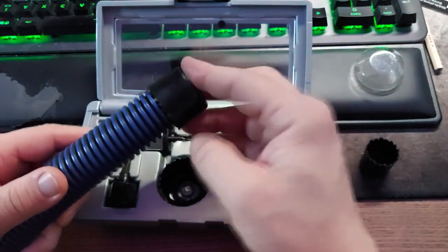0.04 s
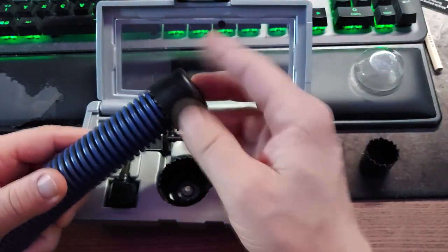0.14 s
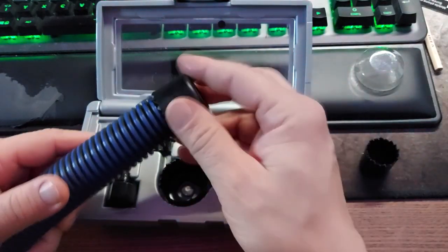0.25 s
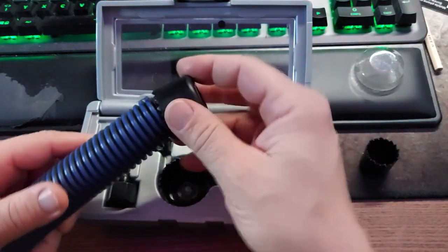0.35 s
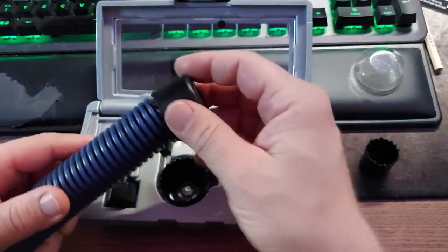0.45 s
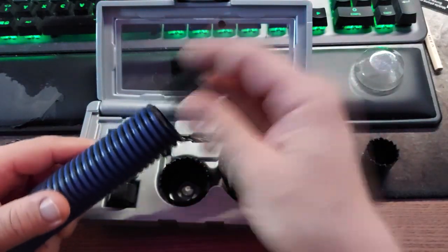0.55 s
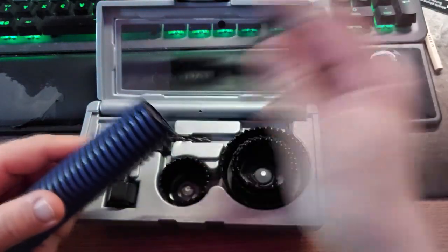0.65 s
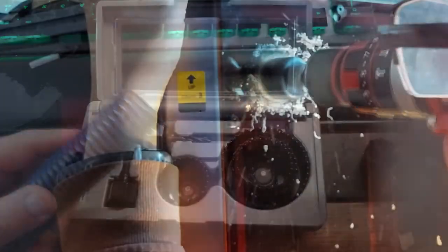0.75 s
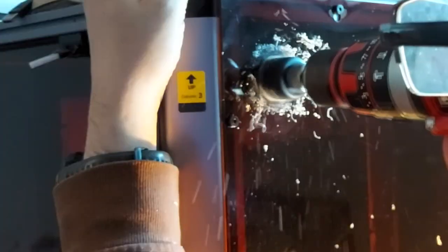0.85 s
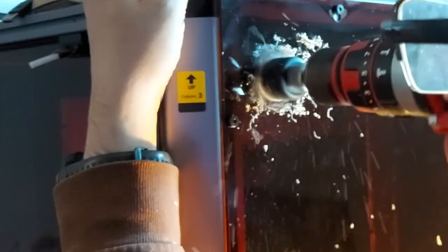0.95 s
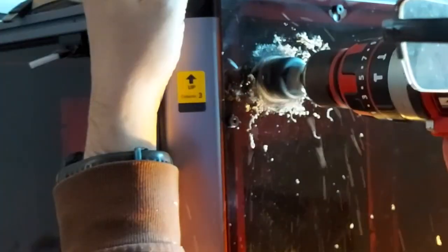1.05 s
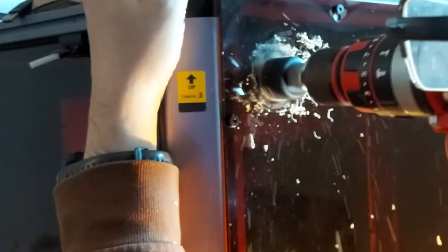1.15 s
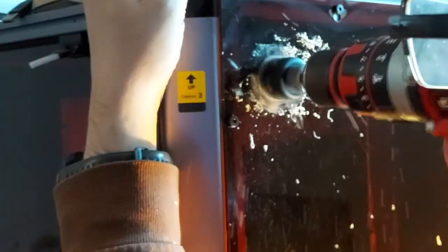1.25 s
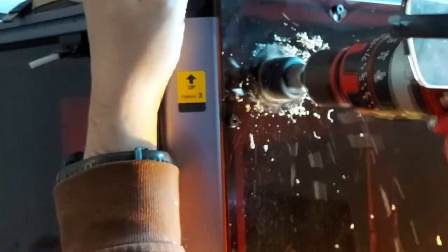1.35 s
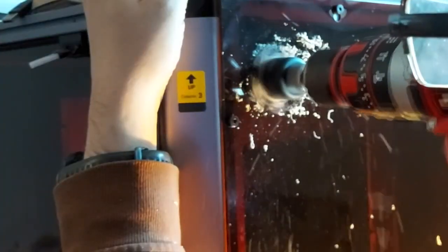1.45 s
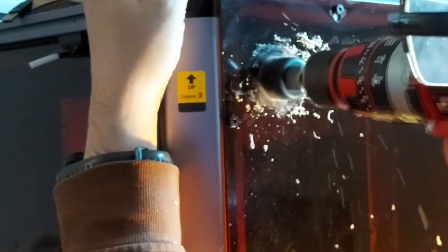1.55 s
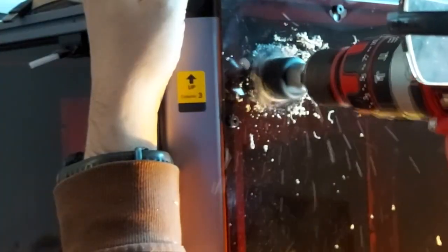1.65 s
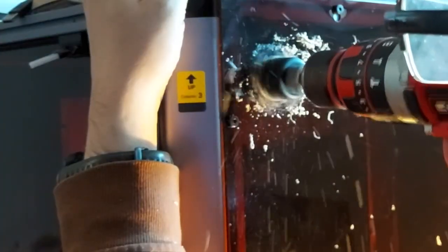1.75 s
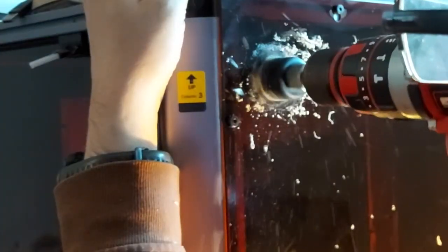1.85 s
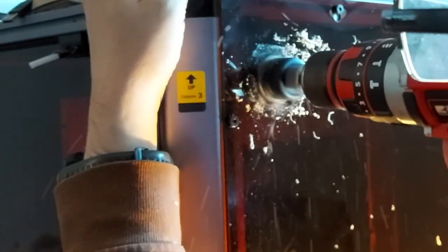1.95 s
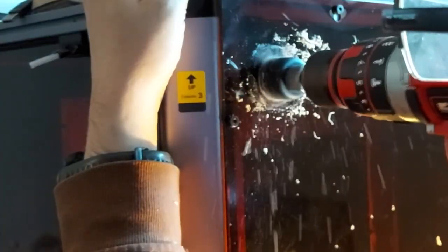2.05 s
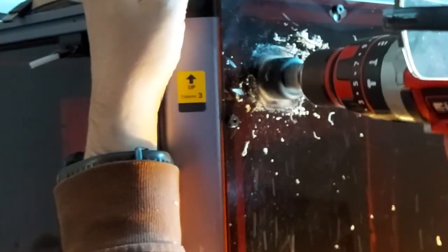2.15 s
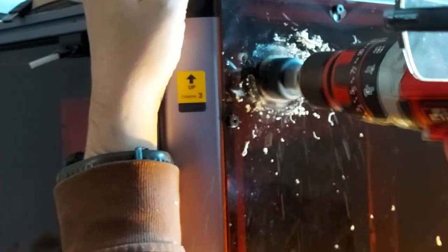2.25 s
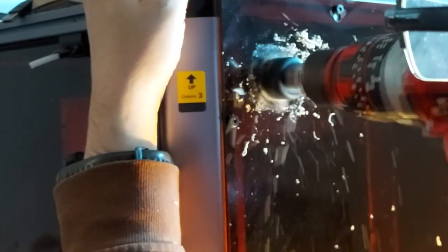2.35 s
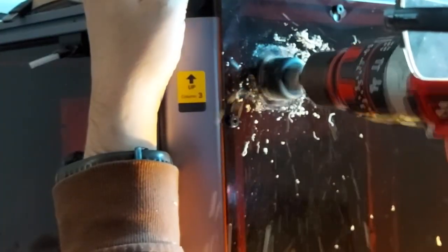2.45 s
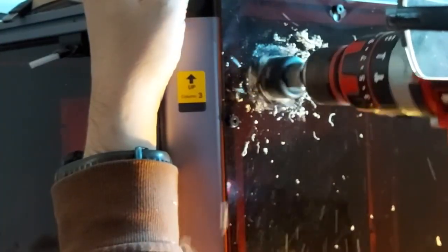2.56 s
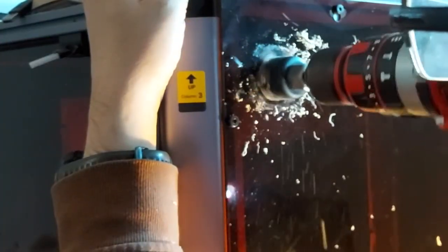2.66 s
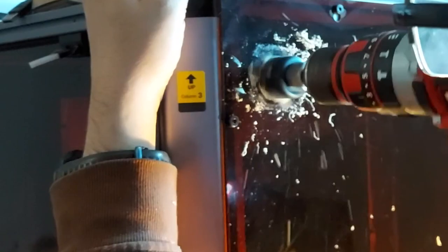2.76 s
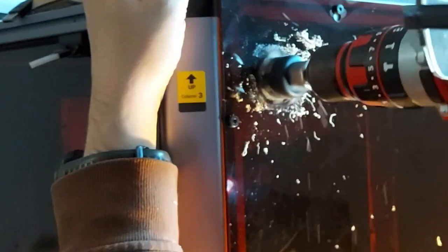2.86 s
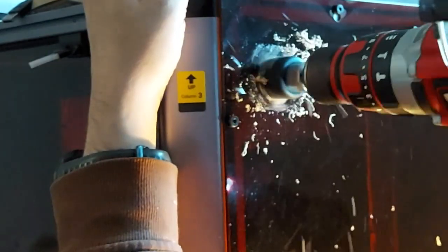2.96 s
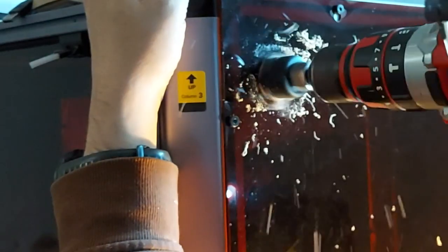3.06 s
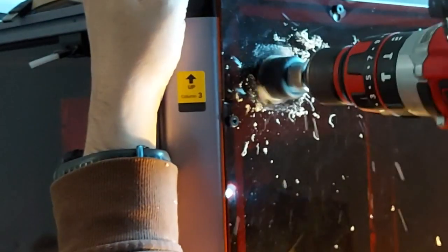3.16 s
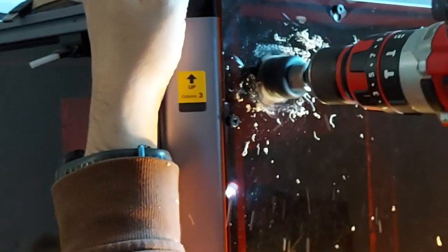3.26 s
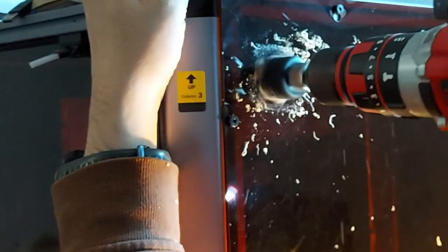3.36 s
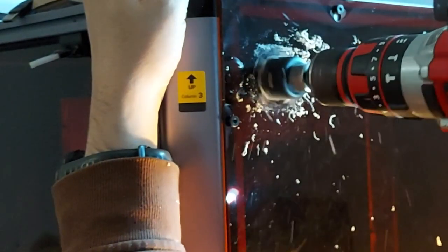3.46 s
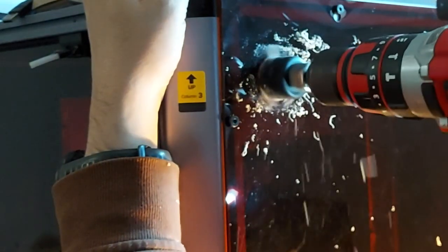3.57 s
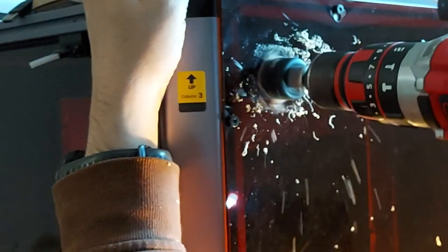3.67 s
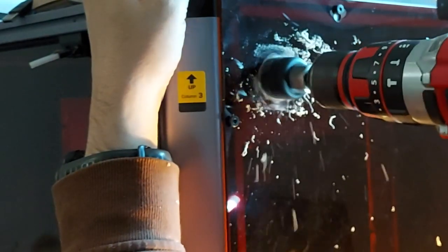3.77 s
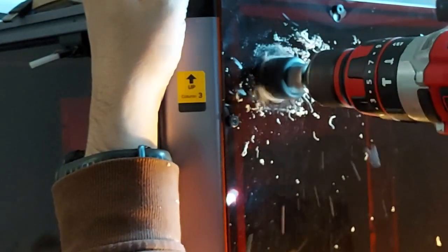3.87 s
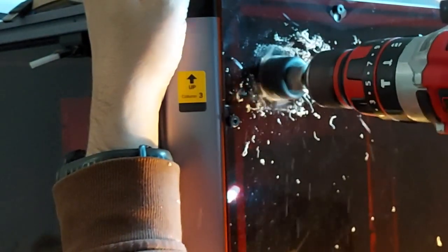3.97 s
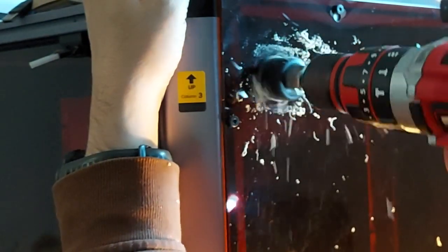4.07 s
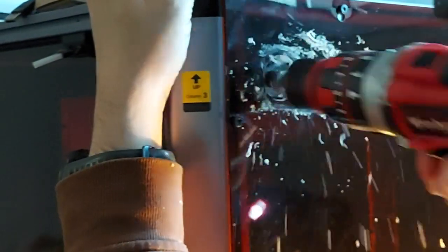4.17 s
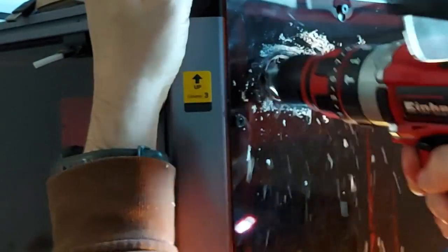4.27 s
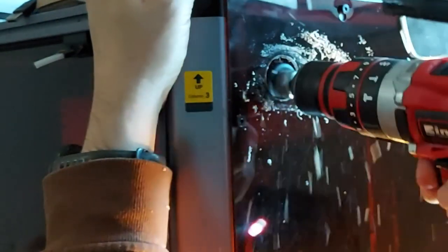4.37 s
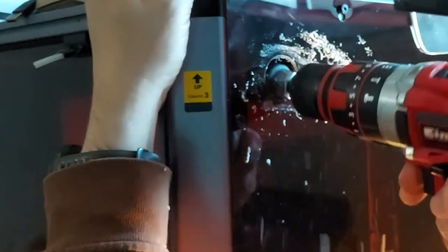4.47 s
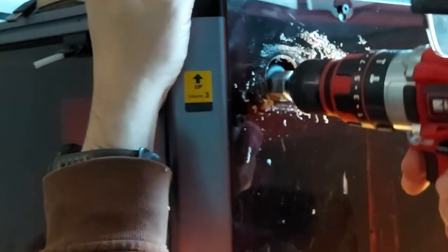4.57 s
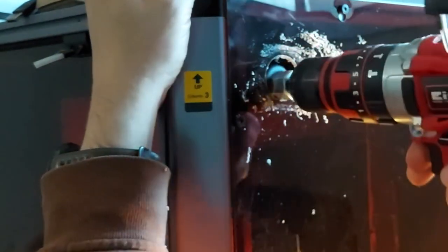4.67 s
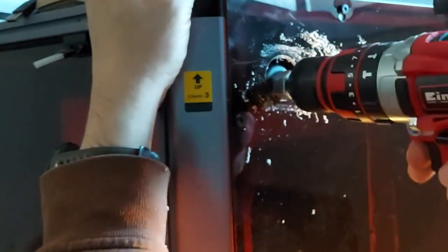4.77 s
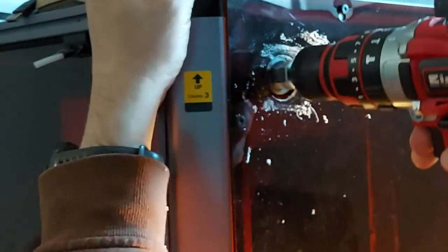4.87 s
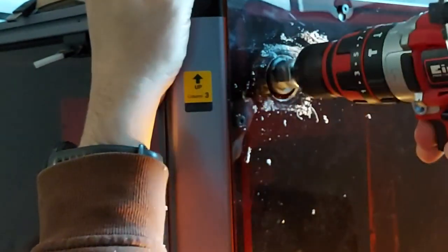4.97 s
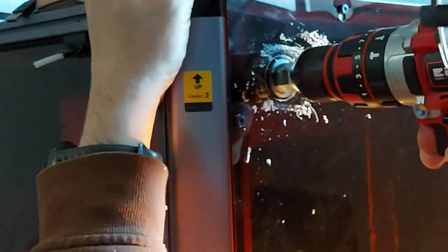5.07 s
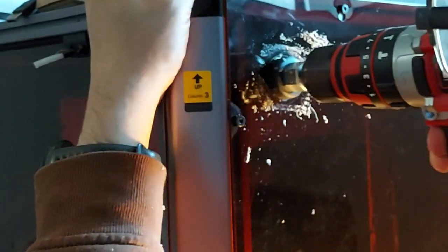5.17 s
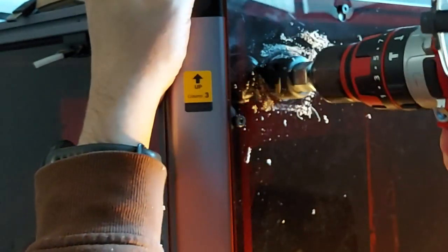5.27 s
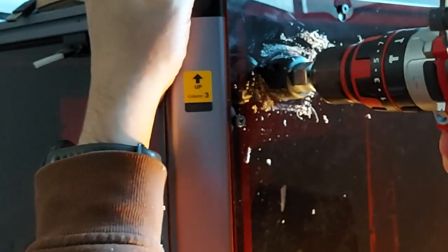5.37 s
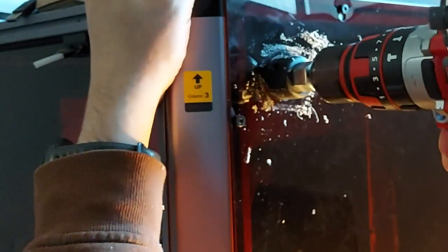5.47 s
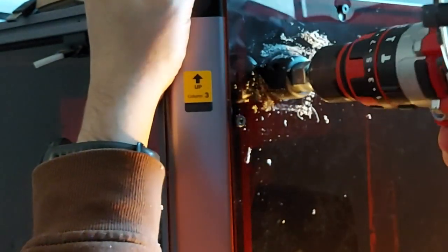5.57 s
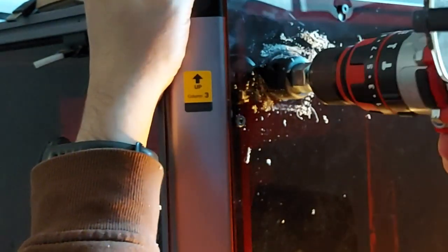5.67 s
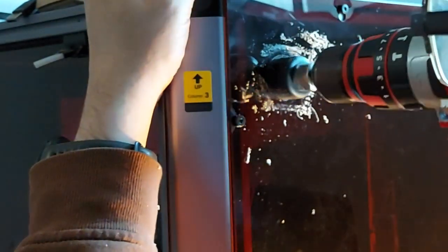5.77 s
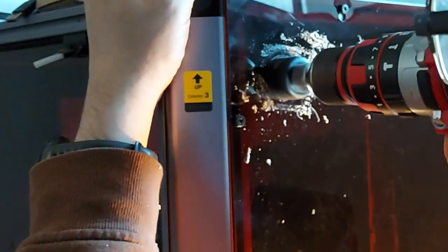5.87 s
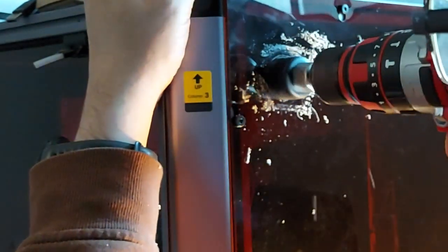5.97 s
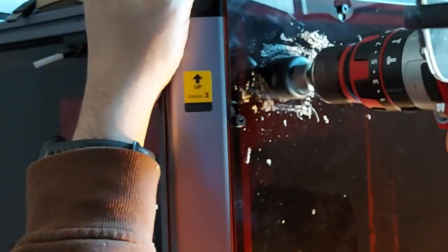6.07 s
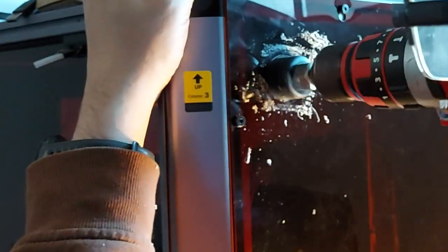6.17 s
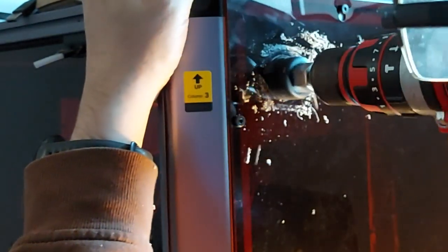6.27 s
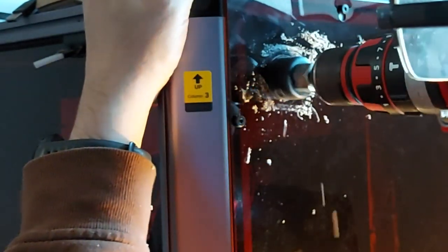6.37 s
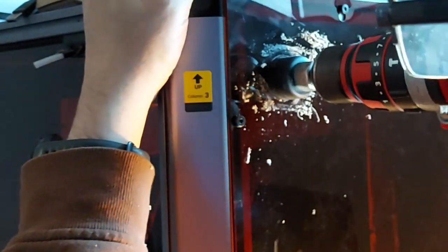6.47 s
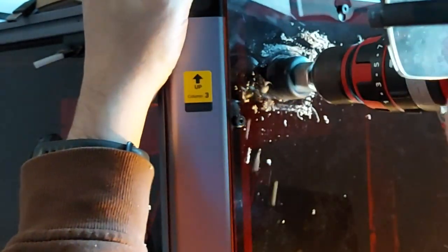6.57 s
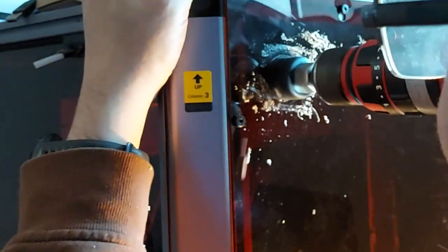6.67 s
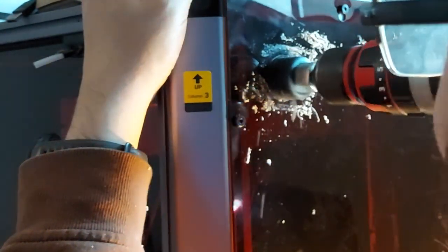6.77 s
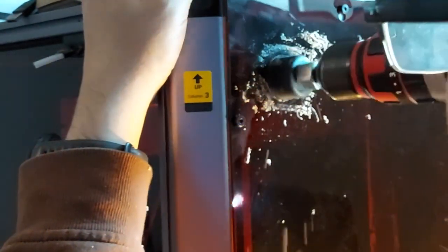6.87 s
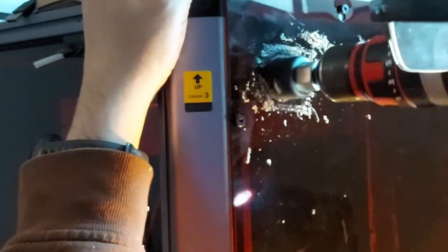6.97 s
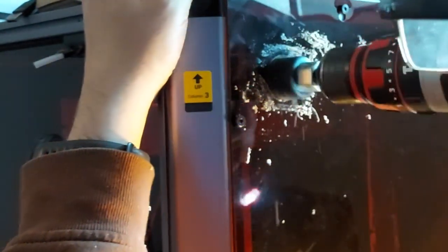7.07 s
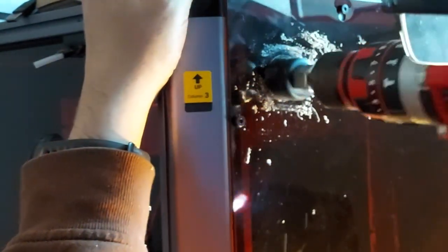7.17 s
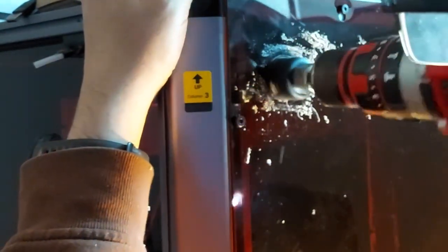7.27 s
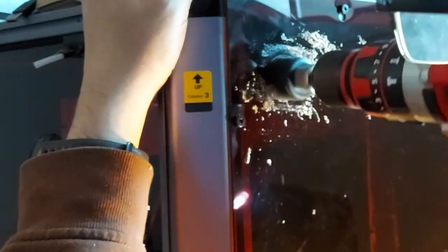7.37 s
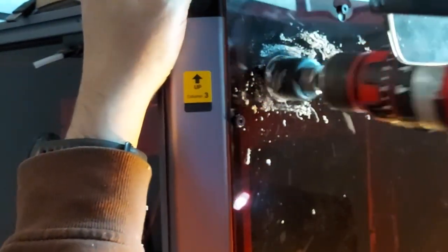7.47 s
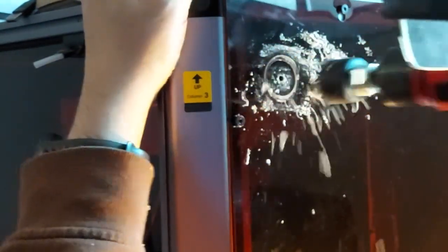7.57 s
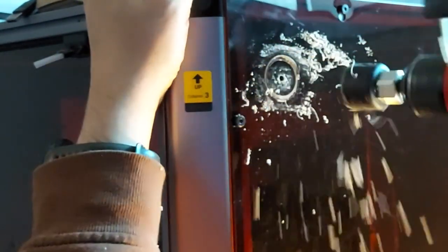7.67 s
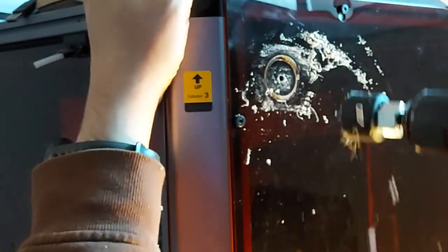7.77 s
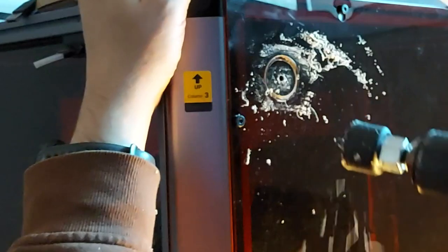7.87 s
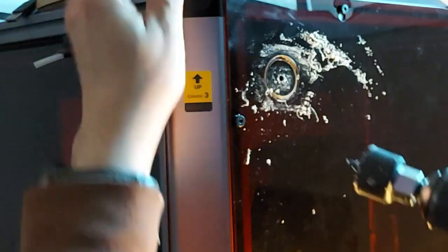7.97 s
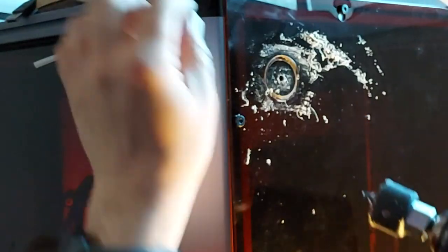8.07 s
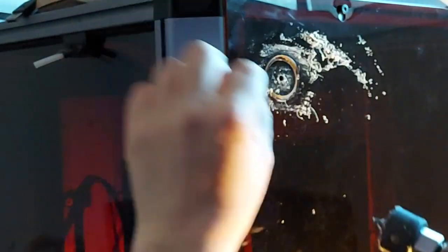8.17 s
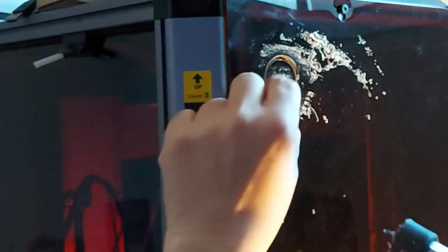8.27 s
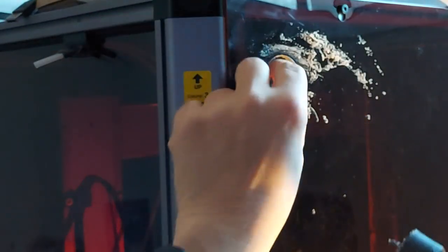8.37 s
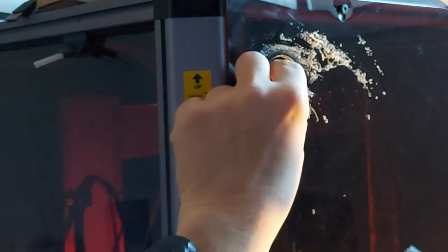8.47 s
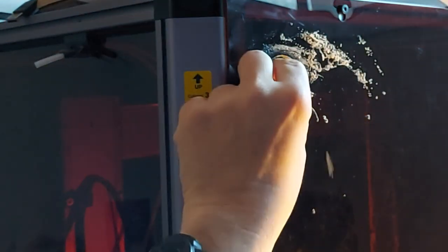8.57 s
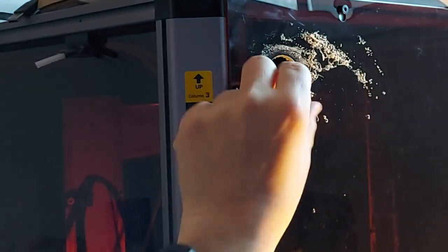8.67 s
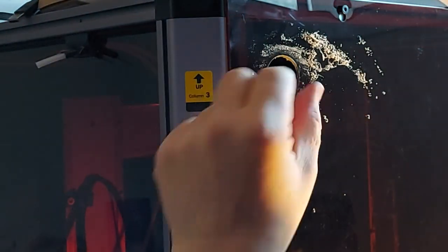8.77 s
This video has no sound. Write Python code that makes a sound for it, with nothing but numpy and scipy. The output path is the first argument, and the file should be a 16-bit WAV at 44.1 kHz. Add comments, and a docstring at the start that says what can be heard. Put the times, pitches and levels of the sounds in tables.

```python
"""A faint tap on a quiet desk, a thin whistle and two tiny squeaks; then a cut to a workshop, where a
cordless drill drives a hole saw into a plastic panel, jams, is lifted, set down again and finishes
slowly. Fingers pick at the chips. Gears whine over the rasp of the teeth, blows ring the plastic, the
panel rattles and the bench booms. Two close microphone ports hear it in a small room."""
import sys
import numpy as np
from scipy import signal
from scipy.fft import rfft, irfft, next_fast_len
from scipy.io import wavfile
from scipy.ndimage import uniform_filter1d

SR = 44100
rng = np.random.default_rng(int(sys.argv[2]) if len(sys.argv) > 2 else 0)


def store_wav(level_fs):
    """Save 16-bit WAV to argv[1]."""
    pcm = np.round(np.clip(np.atleast_2d(level_fs), -1, 1) * 32767)
    wavfile.write(sys.argv[1], SR, pcm.T.astype(np.int16))


N = 388976
T = np.arange(N) / SR
FFT_SIZE = next_fast_len(N + 8192)
FREQS = np.maximum(np.arange(FFT_SIZE // 2 + 1) * SR / FFT_SIZE, 1)

# room tone of each place (frequency [Hz], relative level [dB])
DESK_SPECTRUM = [(18, -67), (30, -28), (161, -4), (319, -15), (384, -20.5), (988, -31), (1100, -23),
                 (1320, -31), (3400, -37.5), (3670, -44), (8980, -45.5), (11100, -53), (16000, -33)]
SHOP_SPECTRUM = [(18, -48), (30, -20), (81, 3), (106, -15.5), (355, -20.5), (449, -20.5), (988, -33.5),
                 (2750, -35.5), (7670, -42), (8980, -52.5), (16000, -36)]
# sharp cracks, mostly teeth on the panel (time [s], level [dB], colour [Hz])
CRACK_HITS = [(0.1235, -43, 1250), (2.289, -12, 3000), (2.2993, -11, 2600), (2.3405, -9.5, 2030),
              (2.352, -10.5, 2200), (2.549, -16, 2060), (2.885, -18, 2160), (3.19, -10, 1750),
              (3.752, -10, 2180), (4.068, -13.5, 1700), (4.157, -11, 2800), (4.173, -8, 2128),
              (4.183, -6, 1780), (4.19, -12, 1790), (4.2576, -4, 2900), (4.269, -4, 2300),
              (4.281, -15, 1700), (4.327, 0, 2400), (5.67, -37, 1500), (5.674, -23, 1200), (5.66, -26, 900),
              (5.7, -32, 2000), (5.682, -28, 1500), (5.7862, -18.5, 2900), (5.7915, -20, 2900),
              (5.8004, -16, 3000), (5.815, -21, 2600), (7.514, -8, 1500)]
# tool and fingers tap desk and panel (time [s], level [dB], colour [Hz], bass [dB])
TAP_HITS = [(0.128, -55, 480, 4), (3.205, -17, 870, -18), (3.555, -20.5, 760, -27), (3.76, -16, 870, -22),
            (4.173, -12, 694, -14), (4.19, -14.5, 750, -7), (4.27, -11, 600, -2.5), (4.286, -15, 480, -3),
            (4.682, -43, 565, -10.5), (4.689, -42.5, 494, 2), (4.873, -39.5, 2980, -21.5),
            (4.933, -36.5, 1660, -2), (4.948, -37, 557, -0.5), (5.098, -51, 620, -12.5),
            (5.232, -23, 2010, -9), (5.247, -31.5, 400, 2), (5.305, -33, 420, 0), (5.318, -32, 1500, -6),
            (5.333, -38, 1200, -2), (5.356, -37.5, 900, -9), (5.449, -40.5, 1000, -14),
            (5.523, -36, 1100, -13), (5.542, -42, 890, -7), (5.584, -29, 1870, -20),
            (5.595, -28, 1900, -22), (5.785, -25.5, 500, -8), (5.803, -28, 450, -2.5),
            (8.297, -49.5, 622, -6.5), (8.313, -47.5, 1900, 0.5), (8.322, -53, 398, 4),
            (8.465, -56.5, 1700, -11), (8.531, -50, 4800, -24), (8.618, -53, 1590, -6.5),
            (8.774, -42, 660, -8.5), (8.787, -47.5, 647, -8)]
# the panel's low ring (frequency [Hz], relative level [dB], t60 [s])
PANEL_MODES = [(70, -8.5, 0.21), (139.8, -1.5, 0.19), (263, 4, 0.098), (345, -2.5, 0.077)]
# the plastic's clack (frequency [Hz], bandwidth [Hz])
PLASTIC_MODES = [(480, 67), (650, 80), (870, 90), (1150, 200), (1650, 240), (2100, 240), (2950, 350),
                 (4250, 570), (5800, 700)]
# rising whistle (time [s], pitch [Hz], level [dB])
WHISTLE_GLIDE = [(0.37, 5800, -100), (0.44, 6900, -87), (0.52, 8150, -84), (0.6, 8300, -87),
                 (0.68, 8900, -96)]
# squeaks of the hose cap and saw cup (time [s], pitch [Hz], level [dB], t60 [s])
SQUEAK_RINGS = [(0.594, 3420, -71, 0.05), (0.655, 3400, -70, 0.06), (5.276, 4120, -28, 0.07)]
# one list per trigger pull (time [s], gear mesh rate [Hz], cut level [dB], whine [dB], panel shake [dB])
TRIGGER_PULLS = [
    [(0.74, 1699, -65, 0, 8), (0.76, 1702, -38.5, 2.5, -1), (0.83, 1697, -30, 1, -0.5),
     (1.1, 1701, -28.5, 2.5, 0), (2.17, 1684, -28.5, -0.5, -1.5), (2.3, 1665, -28.5, -3, 1.5),
     (2.37, 1400, -31.5, -2, 5.5), (2.44, 1320, -33, -10, 3), (2.63, 1201, -33.5, -12, -1.5),
     (2.72, 1547, -30.5, -2, -4.5), (2.78, 1636, -31.5, 5.5, -1.5), (2.86, 1430, -30.5, -12, -1),
     (2.92, 1589, -30.5, 1, -2), (3.06, 1704, -29.5, -0.5, 1), (4.01, 1698, -30.5, -0.5, 0),
     (4.14, 1701, -29, -0.5, 5.5), (4.165, 1673, -27, -9, 6), (4.2, 1703, -28.5, -3, 10),
     (4.26, 1748, -31.5, 1.5, 11.5), (4.4, 1776, -35, 2.5, 9.5), (4.51, 1570, -39.5, -4, 13.5),
     (4.68, 1303, -78.5, -21, 26.5)],
    [(5.8, 1564, -48, -13, 11.5), (5.9, 1572, -33, 0, 5.5), (6.08, 1236, -38, 0, 5),
     (6.34, 736.6, -44, 0.5, -0.5), (6.48, 1065, -39.5, 1, 4.5), (6.92, 1059, -39, 0.5, 2.5),
     (7.0, 1021, -38.5, -5, 5.5), (7.22, 1021, -39, -3, 5), (7.33, 1042, -38.5, 0, 16),
     (7.39, 1524, -33.5, 1, 4), (7.46, 1679, -31.5, 1.5, 7.5), (7.6, 1776, -32, -1, 9.5),
     (7.66, 1758, -34, 3.5, -10), (7.75, 1610, -33.5, -3, -7), (7.88, 1500, -61.5, -24.5, -2),
     (7.98, 1300, -83, -10, -0.5)],
]
# motor and gear tones (multiple of the mesh rate [ratio], relative level [dB])
GEAR_PARTIALS = [(.2, -11.5), (.8, -9.5), (1, -2.5), (1.2, -13), (2, -2), (2.13, -6), (3, -1), (4, -21),
                 (6, -14)]
# level rides on the lower tones (time [s], 1x [dB], 2x [dB], 2.13x [dB], 0.8x and 1.2x [dB])
GEAR_RIDES = [(0.74, -6, -8, -8, -5), (2.3, -5, -8, -3, -4), (2.95, -1, -4, -10, -4),
              (3.45, -1, -3, -9, -4), (4.1, -2, -2, -8, -2), (4.3, 0.5, -14, -8, 0),
              (5.9, -7.5, -5, -10, -6), (6.08, -6, -6, -4, -9), (6.2, 1.5, -6, 8, -8),
              (6.35, 3, -12, -3, -8), (6.45, -2, -8, -3, -8), (6.53, 0, -6, 5, -4), (6.64, -1, -8, -6, -3),
              (6.7, -1.5, -8, 10, -4), (6.81, -3, -8, 4, -6), (6.92, -1, -4, -6, -4),
              (6.97, -14, 7, -8, -6), (7.1, -14, 4, -10, -6), (7.23, -12, 3, -10, -6),
              (7.3, -1.5, -4, -8, -5), (7.45, -3, -14, -12, -2)]
# the other tones falter as the saw grabs (centre [s], width [s], depth [dB])
WHINE_DIPS = [(1.46, 0.04, -16), (3.62, 0.03, -8), (3.92, 0.07, -12), (4.055, 0.03, -6), (5.85, 0.09, -14),
              (5.925, 0.02, -12), (7.355, 0.07, -22)]
# resonances of the drill housing (frequency [Hz], gain [dB])
HOUSING_EQ = [(300, -6), (740, -2), (860, -7), (1050, 4), (1260, -2.5), (1360, 1), (1700, -2.5), (2100, -2),
              (2260, 1.5), (2600, -3), (3150, -9), (3400, -3), (3750, -1.5), (4700, 3), (5100, 0.5),
              (5400, -1), (6300, -8), (7000, -2), (10500, -11.5)]
# noise layers of the cut (frequency [Hz], relative level [dB])
TEETH_SPECTRUM = [(260, -41), (450, -2.5), (505, -10), (858, -1.5), (945, -2), (1340, 1), (1440, 0),
                  (1700, 2.5), (2450, -1), (4500, -9), (5850, -42), (9900, -120)]
HISS_SPECTRUM = [(1760, -18), (3000, -2), (4630, -3), (4900, 0.5), (5220, -6), (5330, -1), (6670, -2),
                 (9940, -14), (12300, -16), (15000, -16), (16000, -23)]
RATTLE_SPECTRUM = [(59, -51), (100, -21), (125, -5.5), (152, 1.5), (178, -6.5), (206, 0), (264, -4.5),
                   (302, 1.5), (506, -7.5), (650, -4), (840, -20), (1430, -120)]
BOOM_SPECTRUM = [(15, -48.5), (25, -23), (52, -20), (66, 10), (78, 7.5), (102, -19.5), (110, -10.5),
                 (140, -40.5), (240, -120)]
SQUEAL_SPECTRUM = [(9000, -41), (12000, -0.5), (14000, -3.5), (16000, -6.5)]
# bands where the rasp flares (frequency [Hz], bandwidth [Hz])
FLARE_BANDS = [(1100, 170), (1500, 210), (1900, 210), (2200, 150), (3200, 400), (4400, 300)]
# accents as the saw snags (centre [s], width [s], teeth [dB], rattle [dB], boom [dB], squeal [dB])
SNAG_ACCENTS = [(2.09, 0.076, 0, 2, 15, 4), (2.36, 0.062, 4, 4.5, 5.5, 15.5), (3.2, 0.039, 4.5, 0.5, 0, -2),
                (3.77, 0.049, 5.5, 2, 1.5, 11), (4.085, 0.033, 1.5, 2.5, 0, 13.5),
                (4.18, 0.059, 4, 5.5, 3, 16.5), (4.276, 0.041, 6.5, 9.5, 7, 10),
                (4.316, 0.062, 2.5, 5.5, 21.5, 8), (7.52, 0.046, 0.5, 8.5, 1.5, -0.5)]
# speed controller tones (start [s], end [s], pitch [Hz], level [dB])
CONTROLLER_TONES = [(2.423, 2.678, 4250, -44), (6.799, 7.22, 4930, -56), (6.918, 7.247, 5830, -48.5),
                    (7.24, 7.344, 4270, -40.5)]
# idle saw in the groove (start [s], rise [s], hold [s], teeth level [dB], treble [dB], panel [dB])
SCRAPE_STROKES = [(5.083, 0.11, 0.0057, -56.5, -15, 8.5), (5.224, 0.0028, 0.11, -46.5, -12, 3),
                  (5.446, 0.0037, 0.0042, -58.5, -32, 13), (5.52, 0.0024, 0.016, -50.5, -23, 1.5),
                  (5.581, 0.004, 0.077, -37.5, -14.5, -2.5), (5.74, 0.05, 0.038, -38, -23, 3.5)]
# finger on the chips (start [s], rise [s], hold [s], level [dB])
RUB_STROKES = [(8.283, 0.014, 0.051, -61.5), (8.417, 0.034, .02, -63), (8.596, 0.025, 0.057, -67.5),
               (8.77, .003, 0.03, -60.5)]
# hollow colour of the rubbing (frequency [Hz], relative level [dB])
RUB_SPECTRUM = [(200, -6.5), (330, 2.5), (650, -4.5), (1000, -10), (1300, -14), (1600, -4), (2100, -5),
                (2500, -19), (3600, -26), (4200, -12), (5000, -23.5), (5730, -20.5), (7000, -26),
                (16000, -33.5)]
# how alike noise is at the two ports (frequency [Hz], correlation [0-1])
PORT_LIKENESS = [(60, 0.97), (300, 0.89), (700, 0.71), (1500, 0.25), (4000, 0.4), (9000, 0.3), (14000, 0.2)]
# shading by the microphone casing (frequency [Hz], left minus right [dB])
PORT_BALANCE = [(60, -3.5), (110, 0), (200, -4.5), (380, 0.5), (700, -0.5), (1290, 1.5), (2380, -1),
                (4400, 4), (8120, -1), (15000, -9)]

SCENE_CUT_S = 0.76
MOTOR_TRIM_DB = -6.5  # shared by gear whine and motor hiss


def undb(db):
    """Decibels to gain."""
    return 10 ** (np.asarray(db) / 20)


def over_hz(table, hz=FREQS):
    """Read a (frequency, value) table on a log-frequency axis."""
    points, values = np.array(table).T
    return np.interp(np.log(hz), np.log(points), values)


def wander(rate_hz):
    """Smooth random drift with a spread near 1."""
    hold = int(SR / rate_hz)
    steps = np.repeat(rng.standard_normal(N // hold + 1), hold)[:N]
    return 1.288 * uniform_filter1d(uniform_filter1d(steps, hold), hold)


def bump(centre, width):
    """Bell-shaped envelope peaking at 1."""
    return np.exp(-((T - centre) / width * 2) ** 2)


def resonance(x, hz, width):
    """One resonant band, gain 1 at its centre."""
    return signal.lfilter(*signal.iirpeak(hz, hz / width, fs=SR), x)


def stereo_noise(spectrum, grain=1):
    """Coloured noise at rms 1, textured by the gain `grain`: narrow in the bass, wide in the treble."""
    mid, side = rfft(grain * rng.standard_normal((2, N)), FFT_SIZE)
    likeness = over_hz(PORT_LIKENESS)
    pair = np.sqrt(1 + likeness) * mid + np.sqrt(1 - likeness) * side * np.array([[1], [-1]])
    noise = irfft(pair * undb(over_hz(spectrum)), FFT_SIZE)[:, :N]
    return noise / np.std(noise)


def room_tone(level_db=-64.5):
    """A gently wavering bed that cuts from desk to workshop."""
    desk = undb(level_db + 2.1 * wander(13.4)) * stereo_noise(DESK_SPECTRUM)
    shop = undb(level_db + 1.5 * wander(7.1)) * stereo_noise(SHOP_SPECTRUM)
    return np.where(T < SCENE_CUT_S, desk, shop)


def knocks(hits, t60, click, octaves, treble_db, tick_t60=0.02):
    """A click and its rattling tail strike the plastic modes near its colour, with a tick and low ring."""
    out, t = np.zeros(N + SR), np.arange(SR // 5) / SR
    ring = sum(undb(db) * np.sin(2 * np.pi * hz * t) * 1000 ** (-t / decay)
               for hz, db, decay in PANEL_MODES)
    ring /= np.max(np.abs(ring))
    for time, db, hz, bass_db in hits:
        push = 0.41 * rng.standard_normal((2, len(t))) * 1000 ** (-t / np.array([[t60], [tick_t60]]))
        push[:, 0] += click
        contact_hz = min(hz * 2 ** 2.09, 18000)  # the push dulls about two octaves above its colour
        soft = signal.lfilter(*signal.butter(2, contact_hz, fs=SR), push[0])
        body = sum(np.exp(-(np.log2(mode / hz) / octaves) ** 2) * resonance(soft, mode, width)
                   / width ** .6 for mode, width in PLASTIC_MODES)
        tick = signal.lfilter(*signal.butter(2, 5000, "highpass", fs=SR), push[1])
        tick_gain = undb(treble_db + 8 * np.log2(hz / 1500))  # brighter blows tick louder
        blow = body / np.max(np.abs(body)) + tick_gain * tick / np.max(np.abs(tick))
        start = int(time * SR)
        out[start:start + len(t)] += undb(db) * (blow + undb(bass_db) * ring)
    return out[:N]


def whistle():
    """A faint, thin tone glides up over the desk."""
    times, hz, db = np.array(WHISTLE_GLIDE).T
    gain = undb(np.interp(T, times, db, -140, -140) + 3 * wander(50))
    return gain * np.sin(2 * np.pi * np.cumsum(np.interp(T, times, hz)) / SR)


def squeaks(attack_s=0.004):
    """Hose cap and saw cup squeak in short, rough, wavering rings."""
    out = np.zeros(N)
    rough = undb(2.5 * wander(250))
    wavering_time = np.cumsum(1 + 0.012 * wander(250)) / SR
    for start, hz, db, t60 in SQUEAK_RINGS:
        envelope = np.clip((T - start) / attack_s, 0, 1) * 1000 ** (-np.maximum(T - start, 0) / t60)
        out += undb(db) * envelope * rough * np.sin(2 * np.pi * hz * wavering_time)
    return out


def trigger():
    """The drill's mesh rate and its cut, whine and shake levels, silent outside the pulls."""
    mesh_hz = np.interp(T, *np.vstack(TRIGGER_PULLS).T[:2])
    levels = np.full((3, N), -120.0)
    for pull in TRIGGER_PULLS:
        times, _, *columns = np.array(pull).T
        held = (T >= times[0]) & (T <= times[-1] + .004)
        levels[:, held] = [np.interp(T[held], times, column) for column in columns]
    return mesh_hz, *levels


def gear_whine(mesh_hz, whine_db):
    """Tones locked to the motor speed, each fluttering in level and coloured by the housing."""
    out = np.zeros(N)
    phase = 2 * np.pi * np.cumsum(mesh_hz * (1 + 0.002 * wander(70))) / SR
    times, *columns = np.array(GEAR_RIDES).T
    mesh, octave, above_octave, sides = (np.interp(T, times, column) for column in columns)
    rides = {1: mesh, 2: octave, 2.13: above_octave, .8: sides, 1.2: sides}
    falter = sum(db * bump(centre, width) for centre, width, db in WHINE_DIPS)
    for multiple, db in GEAR_PARTIALS:
        drift_db = 3 * wander(20) if multiple < 3 else 0.7 * wander(15)
        level_db = whine_db + db + rides.get(multiple, falter) + over_hz(HOUSING_EQ, multiple * mesh_hz)
        out += undb(level_db + drift_db + 2.5 * wander(70)) * np.sin(multiple * phase)
    return np.sqrt(2) * out


def cutting_levels(cut_db, shake_db, mesh_hz):
    """Faders for the saw's five layers: all follow the cut, and all but the hiss jump at snags."""
    centres, widths, *accents = np.array(SNAG_ACCENTS).T
    teeth, rattle, boom, squeal = np.array(accents) @ bump(centres[:, None], widths[:, None])
    hiss = np.full(N, MOTOR_TRIM_DB)
    rattle += shake_db - 12.5
    boom += 1.36 * shake_db - 18.5 - 0.5 * wander(9)
    squeal += 6.5 * np.log2(mesh_hz / 1700) - 13  # fades as the motor slows
    return cut_db + np.array([teeth, hiss, rattle, boom, squeal])


def chips(per_s, spread_db):
    """Grain that jumps with every chip: mostly small, a few large."""
    hold = int(SR / per_s)
    return np.repeat(undb(spread_db * rng.exponential(size=N // hold + 1)), hold)[:N]


def hole_saw(mesh_hz, teeth_db, hiss_db, rattle_db, boom_db, squeal_db):
    """Teeth rasp and squeal, the motor hisses, the panel rattles and the bench booms."""
    turn = np.cumsum(mesh_hz / 300) / SR % 1  # the uneven bite repeats with each chuck turn
    bite = np.interp(turn, np.arange(16) / 16, rng.standard_normal(16), period=1)
    teeth = undb(teeth_db + 0.48 * bite + 1.38 * wander(45))
    teeth = teeth * stereo_noise(TEETH_SPECTRUM, chips(3000, 1.65))
    teeth += sum((undb(3 * wander(28)) - 1) * resonance(teeth, hz, width) for hz, width in FLARE_BANDS)
    hiss = undb(hiss_db + 5.5 + 0.65 * bite + 1.1 * wander(45))
    hiss = hiss * stereo_noise(HISS_SPECTRUM, chips(9000, 1.5))
    rattle_grain = chips(300, 2.12) * undb(2 * wander(25))
    rattle = undb(rattle_db + 0.46 * bite) * stereo_noise(RATTLE_SPECTRUM, rattle_grain)
    boom = undb(boom_db) * stereo_noise(BOOM_SPECTRUM, chips(60, 1.5))
    squeal = undb(squeal_db + 1.5 * wander(14)) * stereo_noise(SQUEAL_SPECTRUM, chips(4000, 2.5))
    return place_right(teeth + hiss + squeal) + rattle + boom


def speed_controller(fade_s=0.0071):
    """The controller's switching sings at part throttle."""
    out = np.zeros(N)
    for start, end, hz, db in CONTROLLER_TONES:
        gate = np.clip(np.minimum(T - start, end - T) / fade_s, 0, 1)
        gain = gate * undb(db + 2 * wander(30))
        out += gain * np.sin(2 * np.pi * np.cumsum(hz * (1 + 0.00195 * wander(18))) / SR)
    return out


def stroke(start, rise, hold, db, rise_db=18, fall_db_per_s=237):
    """One stroke's envelope in dB: it swells, holds and dies away."""
    attack = rise_db * np.clip(1 - (T - start) / rise, 0, 1)
    release = fall_db_per_s * np.maximum(T - start - rise - hold, 0)
    return np.where(T >= start, db - attack - release, -120)


def with_scrapes(levels):
    """The idle saw scrapes in the groove; the louder of scrape and cut sets each fader."""
    for start, rise, hold, db, treble_db, panel_db in SCRAPE_STROKES:
        boom_db, squeal_db = panel_db - 9.5, treble_db + 6.5
        offsets = np.array([0, treble_db, panel_db, boom_db, squeal_db])
        levels = np.maximum(levels, stroke(start, rise, hold, db) + offsets[:, None])
    return levels


def finger_rubs():
    """A finger rubs the chips, grainy through the hollow panel."""
    level_db = np.max([stroke(*row) for row in RUB_STROKES], axis=0)
    return undb(level_db + 2 * wander(40)) * stereo_noise(RUB_SPECTRUM, chips(1500, 2.0))


def place_right(x, lag_s=8 / SR):
    """A source nearer the right port: its treble reaches the left one later."""
    late = np.exp(-2j * np.pi * FREQS * lag_s * np.clip((FREQS - 800) / 1500, 0, 1))
    return irfft(rfft(x, FFT_SIZE) * np.array([late, np.ones_like(late)]), FFT_SIZE)[:, :N]


def room_reverb(send, t60=0.14, return_db=-0.5):
    """The small room's short, diffuse tail, different at each port."""
    t = np.arange(8192) / SR
    tail = rng.standard_normal((2, len(t))) * 1000 ** (-t / t60) * (t > .003)
    tail *= undb(return_db) / np.sqrt(np.sum(tail[0] ** 2))
    return irfft(rfft(send, FFT_SIZE) * rfft(tail, FFT_SIZE), FFT_SIZE)[:, :N]


def scene():
    """Mix everything over the room tone; only tones and blows feed the reverb."""
    mesh_hz, cut_db, whine_db, shake_db = trigger()
    gears = gear_whine(mesh_hz, cut_db + MOTOR_TRIM_DB + whine_db)
    tones = gears + speed_controller() + whistle() + squeaks()
    cracks = [(*hit, -26) for hit in CRACK_HITS]  # cracks carry little bass
    blows = knocks(cracks, t60=0.015, click=7, octaves=0.85, treble_db=-16)
    blows += knocks(TAP_HITS, t60=0.12, click=6.5, octaves=1.5, treble_db=-19)
    bed = room_tone()
    saw = hole_saw(mesh_hz, *with_scrapes(cutting_levels(cut_db, shake_db, mesh_hz)))
    direct = bed + blows + place_right(tones) + saw + finger_rubs()
    return direct + room_reverb(undb(-4) * tones + undb(-3.5) * blows)


def record(dry, top_hz=15900):
    """The casing shades each port differently; a steep low-pass trims the air."""
    tilt = undb(over_hz(PORT_BALANCE) / 2)
    ports = irfft(rfft(dry, FFT_SIZE) * np.array([tilt, 1 / tilt]), FFT_SIZE)[:, :N]
    return signal.sosfilt(signal.ellip(10, .2, 75, top_hz, fs=SR, output="sos"), ports)


dry = scene()
out = record(dry)
store_wav(out)
```